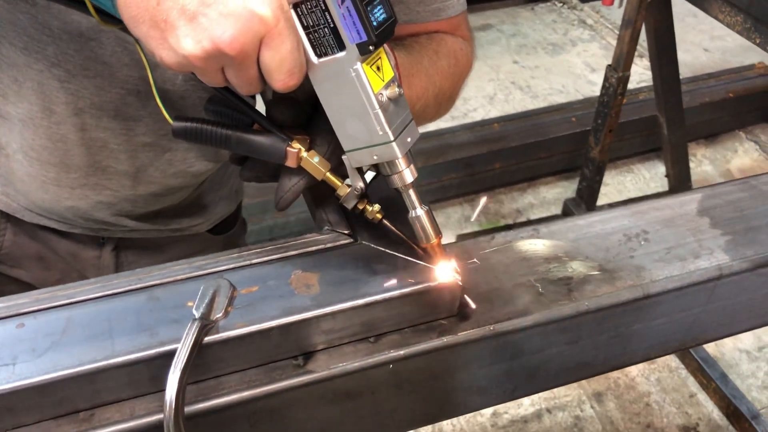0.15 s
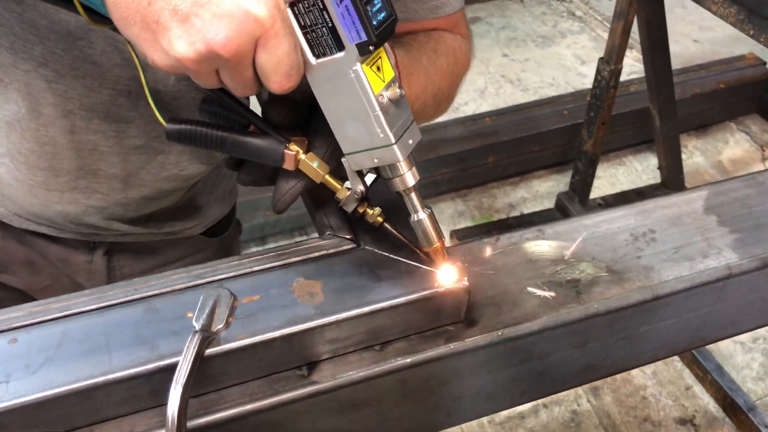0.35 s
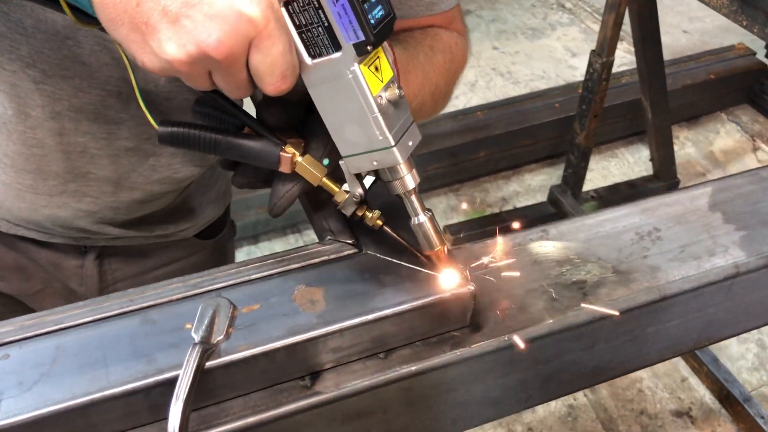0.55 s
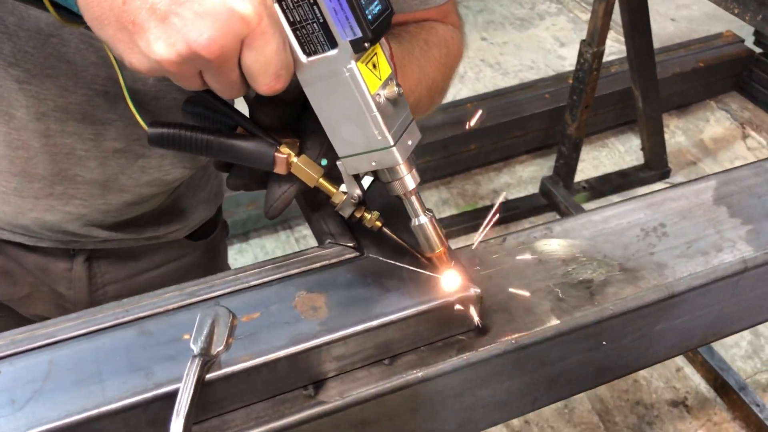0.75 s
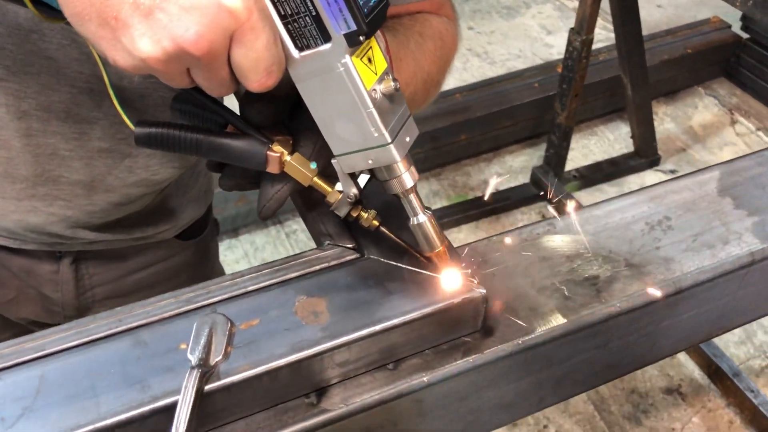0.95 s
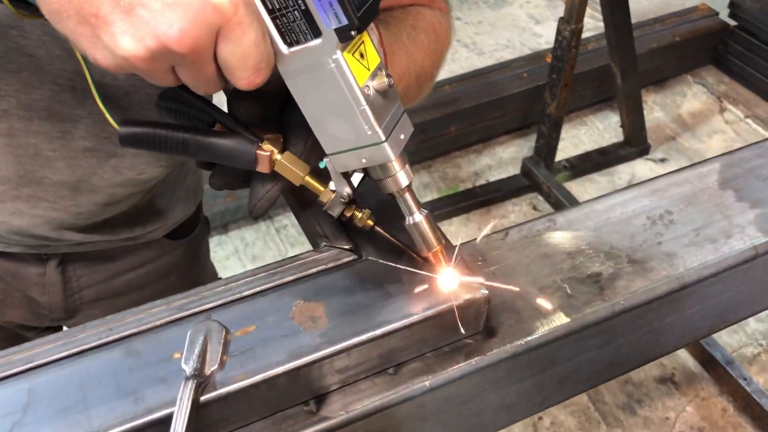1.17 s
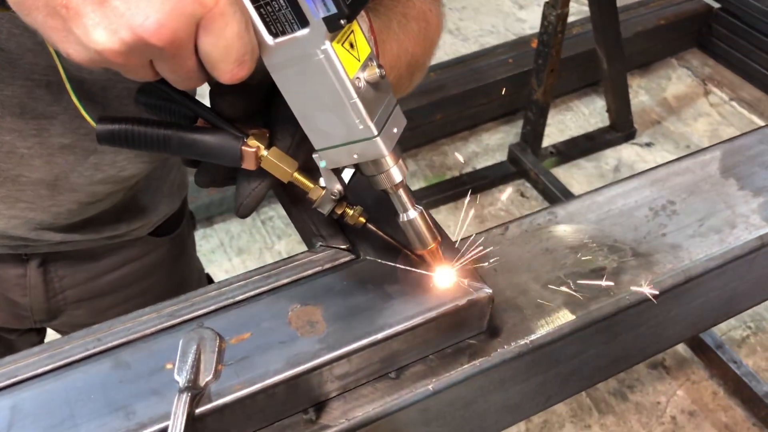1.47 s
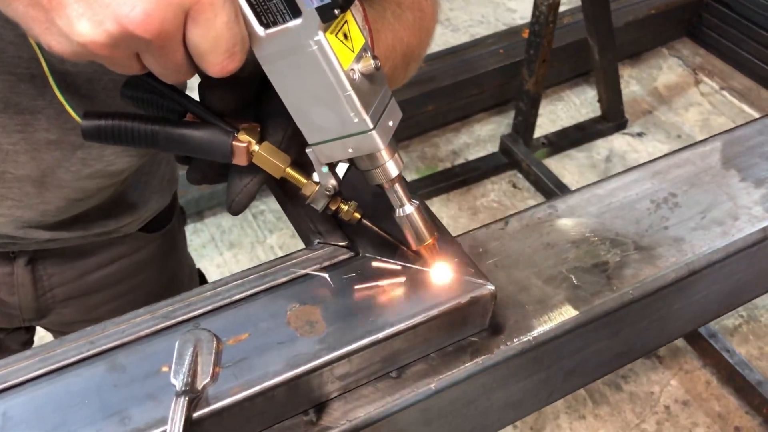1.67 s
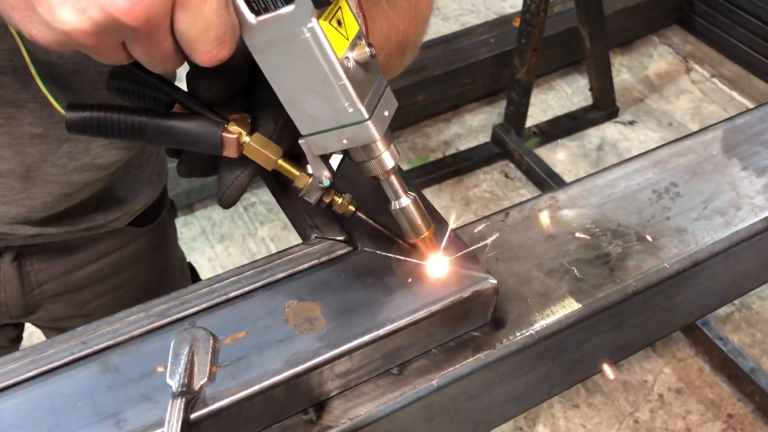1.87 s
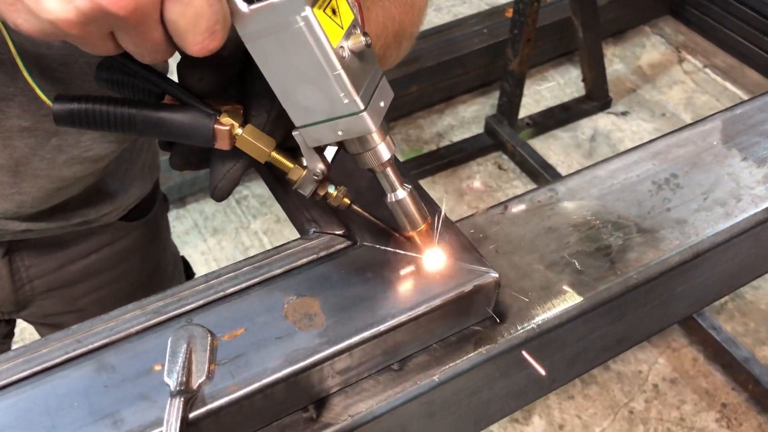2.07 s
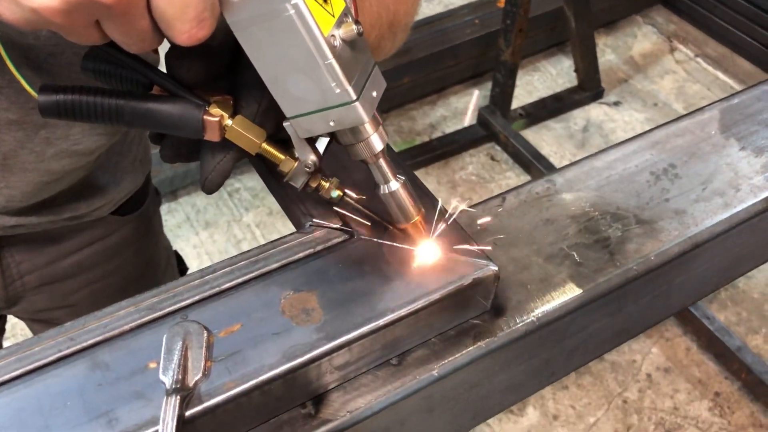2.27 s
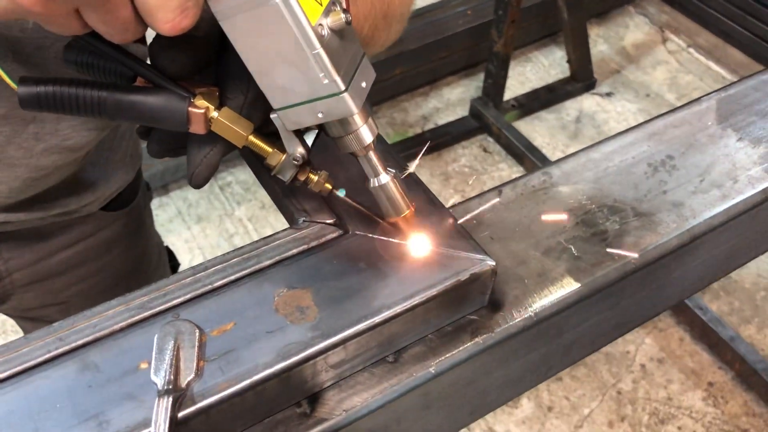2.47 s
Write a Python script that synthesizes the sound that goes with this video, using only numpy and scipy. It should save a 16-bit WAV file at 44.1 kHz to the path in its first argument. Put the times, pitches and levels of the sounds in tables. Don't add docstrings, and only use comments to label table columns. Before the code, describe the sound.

A loud, harsh, treble-heavy welding hiss runs from 0 to about 2.6 seconds, close and dry. It flutters quickly, around forty to one hundred sixty pulses a second, with small sputters and slight dips around 1.3, 1.5 and 2 seconds. Its metallic colour drifts gradually. Underneath are a faint airy hose whistle, low fan rush and motor hum; the hose flow swells near 2.45 seconds.

```python
import sys
import numpy as np
from scipy import signal
from scipy.fft import rfft, irfft, next_fast_len
from scipy.io import wavfile
from scipy.ndimage import uniform_filter1d, map_coordinates

SR = 44100
rng = np.random.default_rng(int(sys.argv[2]) if len(sys.argv) > 2 else 0)


def level_to_linear(level):
    exponent = np.asarray(level, float) / 20
    return 10 ** exponent


def to_wav(s):
    ch = np.atleast_2d(s).T
    pcm = np.round(np.clip(ch, -1, 1) * 32767)
    wavfile.write(sys.argv[1], SR, pcm.astype(np.int16))


N = 115542
SWEEP_HZ = 40.24


def unit(x):
    return x / np.sqrt(np.mean(x ** 2) + 1e-20)


def along(points, hz):
    f, v = np.transpose(points)
    return np.interp(np.log(hz + 1), np.log(f + 1), v)


def wobble(rate):
    knots = rng.standard_normal(int(N * rate / SR) + 4)
    return unit(map_coordinates(knots, [np.arange(N) * rate / SR]))


def filtered(x, response):
    m = next_fast_len(N + 8192)
    return irfft(rfft(x, m) * response(np.fft.rfftfreq(m, 1 / SR)), m)[:N]


def plume_bursts():
    # (multiple of the sweep, depth [dB])
    flare = [(1, 0.3), (2, 1.54), (4, 1.13)]
    crests = [.0115, .00405, .0028]
    flare_growth = 0.46
    sputter_db, flicker_db, drift_db = 1.05, 0.55, 0.24

    t = np.arange(N) / SR
    flare_db = sum(depth_db * np.cos(2 * np.pi * multiple * SWEEP_HZ * (t - crest))
                   for (multiple, depth_db), crest in zip(flare, crests))
    flare_db = flare_db * (1 + flare_growth * (t / t[-1] - .5))
    chance_db = sputter_db * wobble(350) + flicker_db * wobble(44.91) + drift_db * wobble(16)
    return rng.standard_normal(N) * level_to_linear(flare_db + chance_db)


def resonance(hz, start_hz, end_hz, width_hz, travel):
    centre_hz = start_hz + (end_hz - start_hz) * travel
    return 1 / (1 + ((hz - centre_hz) * 2 / width_hz) ** 2)


def metal_colour_db(hz, when):
    # (frequency [Hz], density [dB per Hz])
    plume_spectrum = [(400, -16), (2000, -9.5), (2700, -11), (3300, -15.5), (5500, -12.5), (8500, -4),
                      (15700, -1.7)]
    # (start [Hz], end [Hz], width [Hz], start level [dB], end level [dB])
    moving_peaks = [(3280, 3370, 240, 6.3, 1.7), (3920, 3770, 720, 1.8, 10.2), (4220, 4400, 450, 2.0, 9.3),
                    (4900, 5060, 400, 4.0, 6.2), (6060, 5860, 640, 11.9, 10.8), (6790, 7200, 670, 4.7, 5.1),
                    (7790, 7940, 710, 3.6, 6.7), (9630, 9840, 430, 7.6, 7.1), (9240, 9190, 900, 1.0, 13.2),
                    (10430, 10610, 300, 5.5, 2.2), (11080, 11270, 370, 3.2, 3.9),
                    (11740, 12250, 350, 6.0, 6.3), (12900, 12870, 770, 6.7, 7.2),
                    (15070, 16060, 1000, 11.1, 3.8)]
    # (start [Hz], end [Hz], width [Hz], start level [dB], end level [dB])
    moving_dips = [(4540, 4720, 190, -6.0, -0.8), (5200, 5440, 140, -2.5, -7.5),
                   (6270, 6150, 380, -8.6, -1.0), (9880, 9860, 250, -8.6, -11.3),
                   (13480, 13430, 370, -5.5, -5.4), (15020, 15080, 560, -11.6, 2.5),
                   (14770, 14740, 150, -0.2, 4.2), (8430, 9240, 680, 5.4, -8.5),
                   (10800, 10740, 100, -2.1, -3.1), (2300, 2410, 270, -4.2, 5.5)]
    # (start [Hz], end [Hz], width [Hz], level [dB], deepest [s])
    passing_dips = [(11280, 11980, 230, -13.5, .98), (7800, 8640, 600, -8.9, .2),
                    (12660, 13380, 850, -9.8, .16), (11800, 12230, 310, -11.1, 1.89),
                    (13950, 15000, 350, -3, 1.0), (5350, 5500, 110, 4, 0)]
    passing_s = .89
    shadow_db, shadow_width_hz = -14, 75

    travel = when / when[-1]
    colour_db = along(plume_spectrum, hz)
    for start_hz, end_hz, width_hz, start_db, end_db in list(moving_peaks) + list(moving_dips):
        height_db = start_db + (end_db - start_db) * travel
        colour_db = colour_db + height_db * resonance(hz, start_hz, end_hz, width_hz, travel)
    for start_hz, end_hz, width_hz, db, deepest in passing_dips:
        height_db = db * np.exp(-((when - deepest) / passing_s) ** 2)
        colour_db = colour_db + height_db * resonance(hz, start_hz, end_hz, width_hz, travel)
    shadow_edge_hz = 3087 - 387 * travel ** 1.4
    return colour_db + shadow_db / (1 + np.exp((hz - shadow_edge_hz) / shadow_width_hz))


def plume():
    # (time [s], level [dB])
    effort = [(0, -14), (.11, -15.5), (.5, -15), (1.2, -14), (1.28, -16), (1.36, -14), (1.49, -16),
              (1.56, -15), (1.9, -15), (1.97, -16), (2.08, -14.5), (2.57, -15), (2.62, -16.5)]
    patchy_db = 0.63

    hz, when, z = signal.stft(plume_bursts(), SR, nperseg=1024, noverlap=768)
    hz = hz[:, None]
    gain = level_to_linear(metal_colour_db(hz, when))
    gain = gain / np.sqrt(np.mean(gain[hz[:, 0] < 15700] ** 2, axis=0))
    patches = uniform_filter1d(rng.standard_normal(z.shape), size=9, axis=0)
    patches = uniform_filter1d(patches, size=10, axis=1)
    coloured = z * gain * level_to_linear(patchy_db * unit(patches)) * (hz < 16000)
    hiss = signal.istft(coloured, SR, nperseg=1024, noverlap=768)[1][:N]
    return unit(hiss) * level_to_linear(np.interp(np.arange(N) / SR, *np.transpose(effort)))


def hose():
    # (time [s], level [dB])
    flow = [
        (0.0, -46),
        (0.03, -42.5),
        (2.42, -42),
        (2.48, -38),
        (2.62, -39.5),
    ]
    pipe_hz, pipe_width_hz = 1548, 115

    def ring(f):
        damping = 1j * f * pipe_width_hz
        return damping / (pipe_hz ** 2 - f * f + damping)

    level_db = np.interp(np.arange(N) / SR, *np.transpose(flow)) + 1.2 * wobble(13.05)
    return unit(filtered(rng.standard_normal(N), ring)) * level_to_linear(level_db)


def fans():
    # (frequency [Hz], density [dB per Hz])
    air_spectrum = [(20, -30), (60, -17), (110, -7), (300, -2), (470, -2.5), (700, 5.4), (1000, 0.5),
                    (1250, -6.5)]
    # (time [s], level [dB])
    fan_air = [(0.0, -40), (0.03, -44), (1.31, -45.5), (1.33, -45), (1.36, -43), (1.65, -44), (2.62, -44.5)]

    spectrum = list(air_spectrum) + [(2600, -10), (6000, -37)]
    air = filtered(rng.standard_normal(N), lambda f: level_to_linear(along(spectrum, f)))
    level_db = np.interp(np.arange(N) / SR, *np.transpose(fan_air)) + 0.58 * wobble(13.88)
    return unit(air) * level_to_linear(level_db)


def machine_hum():
    # (frequency [Hz], rms level [dB])
    cooler = [(91.8, -58.5), (165.5, -60.5), (184, -68), (242, -59.5), (370.5, -60.5), (443, -66.5),
              (830, -60)]
    sweep_drive = [-88, -76, -72, -82.5]
    unsteady_db, wander_rad = 1.5, .6

    t = np.arange(N) / SR
    tones = list(cooler) + [((k + 1) * SWEEP_HZ, db) for k, db in enumerate(sweep_drive)]
    hum = np.zeros(N)
    for hz, db in tones:
        strength = np.sqrt(2) * level_to_linear(db + unsteady_db * wobble(7.1))
        hum += strength * np.sin(2 * np.pi * hz * t + wander_rad * wobble(5.87))
    return hum


def scene():
    return (plume() + hose() + fans() + machine_hum())[None]


def roll_off(x):
    return signal.sosfilt(signal.butter(12, 17020, fs=SR, output="sos"), x)


def record(dry):
    ceiling, low_cut_hz, top_hz = .9, 41, 15735
    soft = dry / (1 + np.abs(dry / ceiling) ** 4) ** .25

    def band(hz):
        return (hz < top_hz) * hz ** 2 / (hz ** 2 + low_cut_hz ** 2)

    return roll_off(filtered(soft[0], band)[None])


dry = scene()
out = record(dry)
to_wav(out)
```